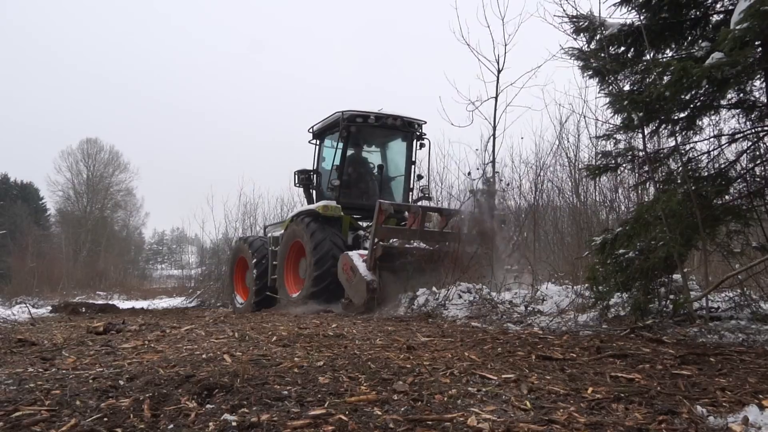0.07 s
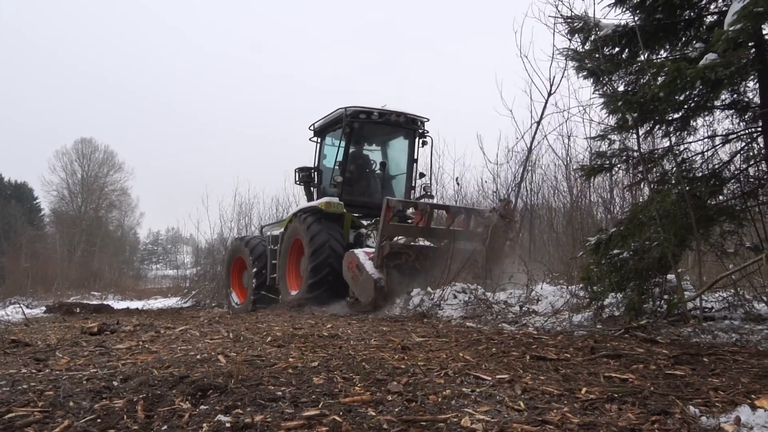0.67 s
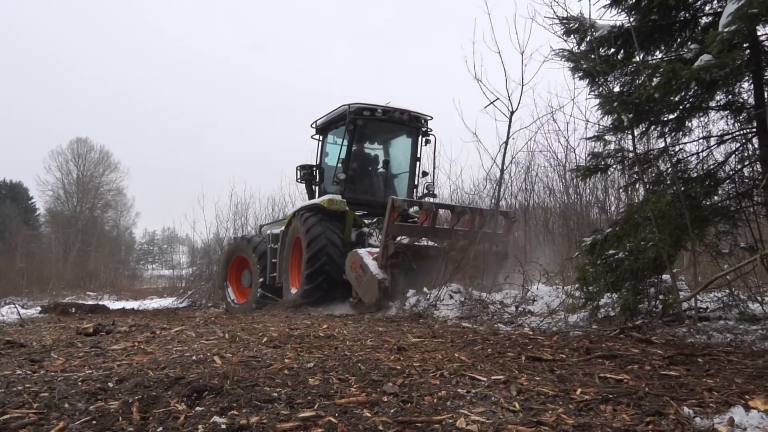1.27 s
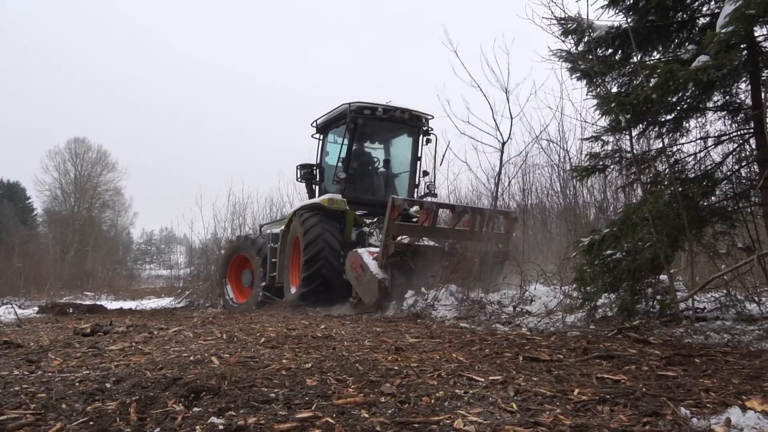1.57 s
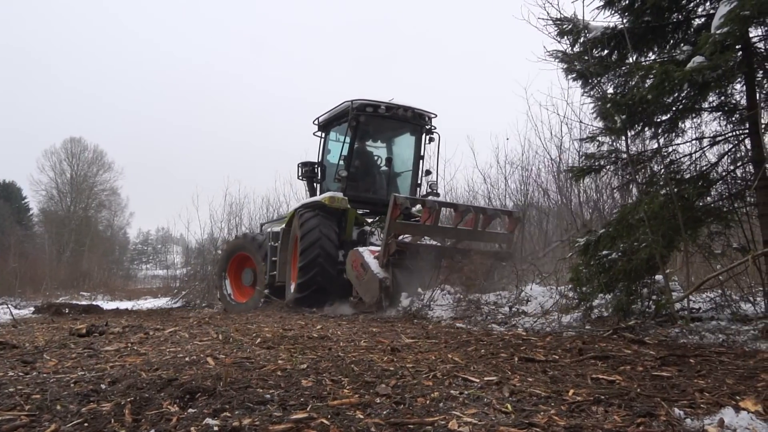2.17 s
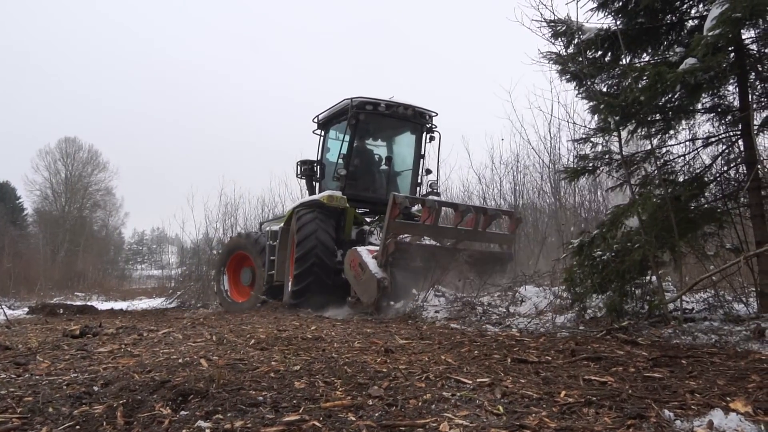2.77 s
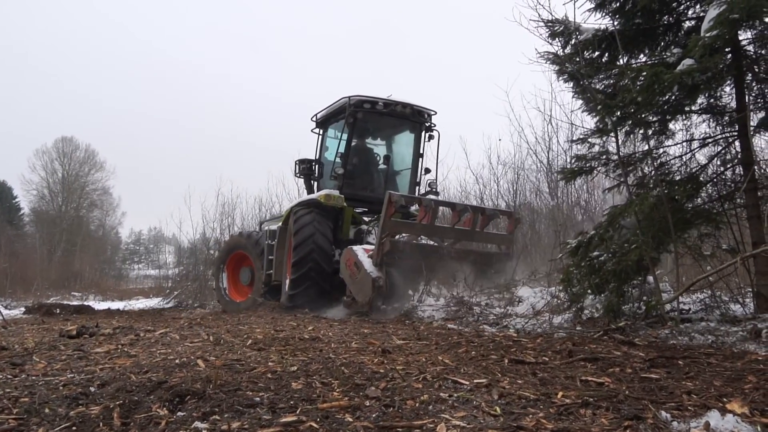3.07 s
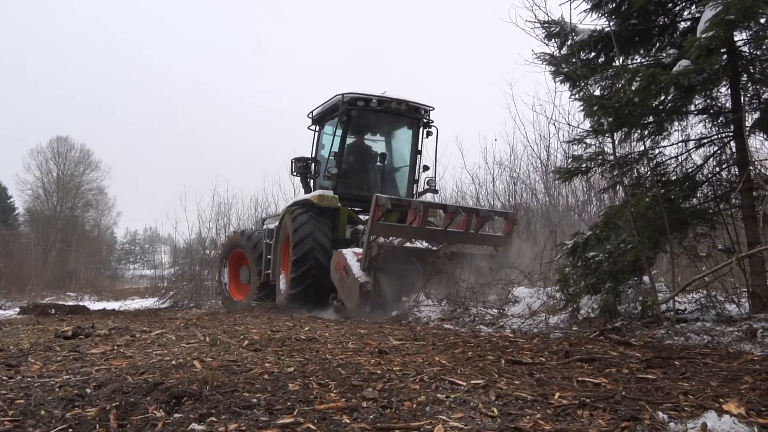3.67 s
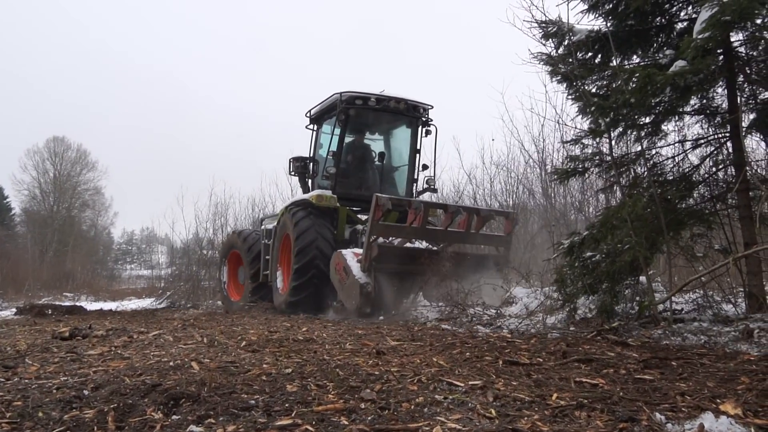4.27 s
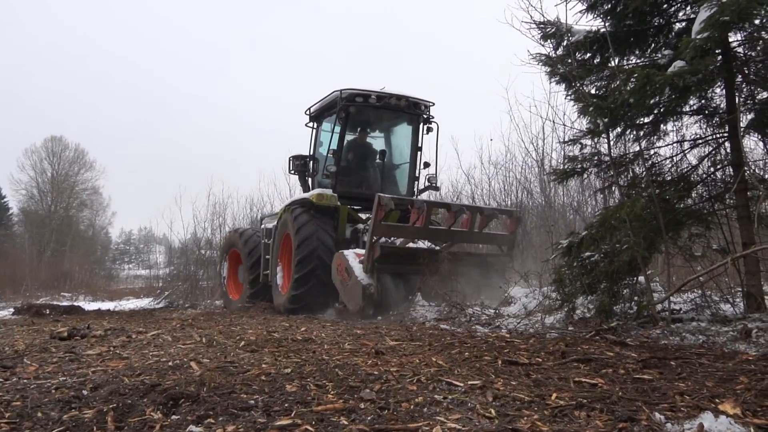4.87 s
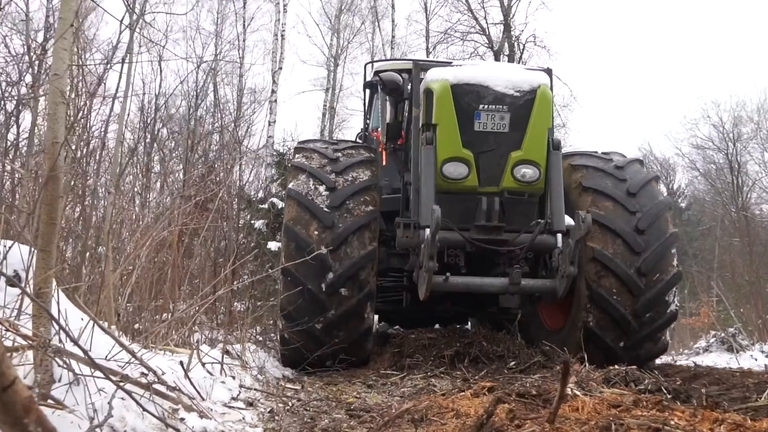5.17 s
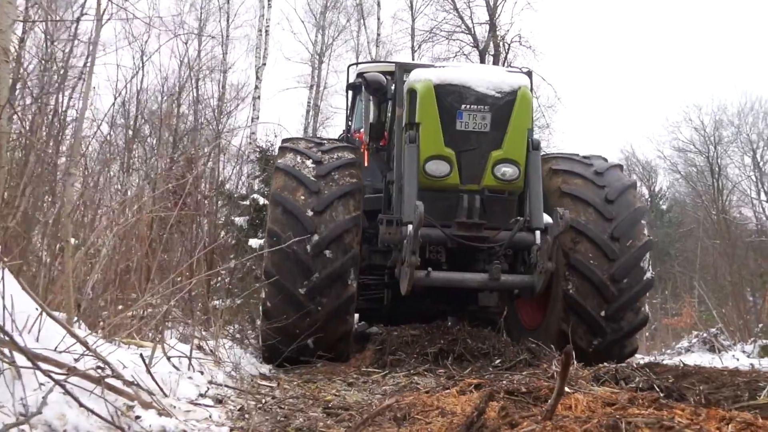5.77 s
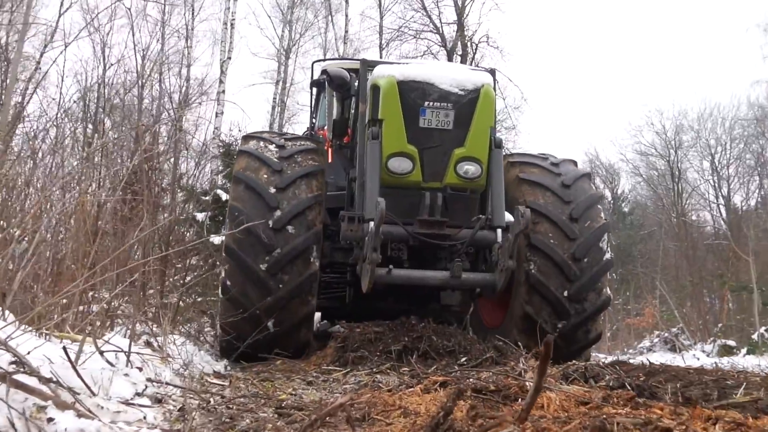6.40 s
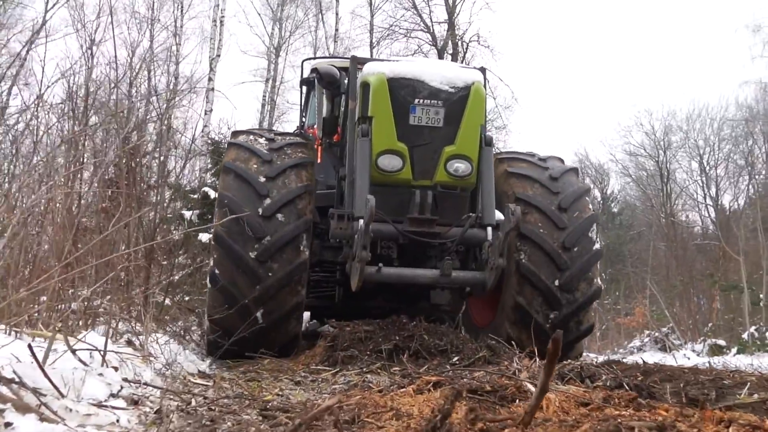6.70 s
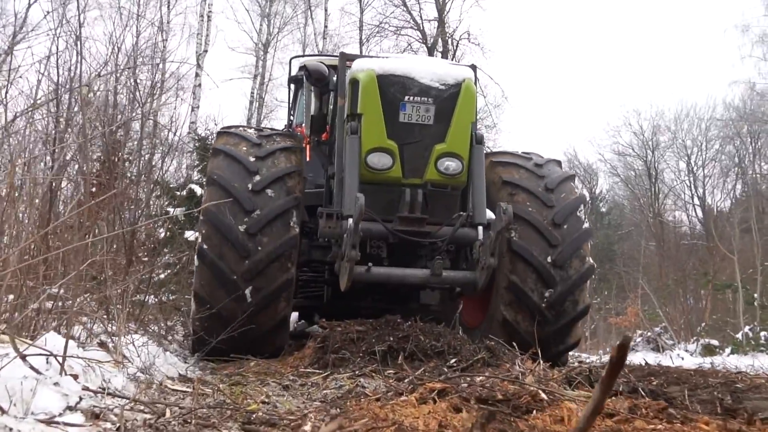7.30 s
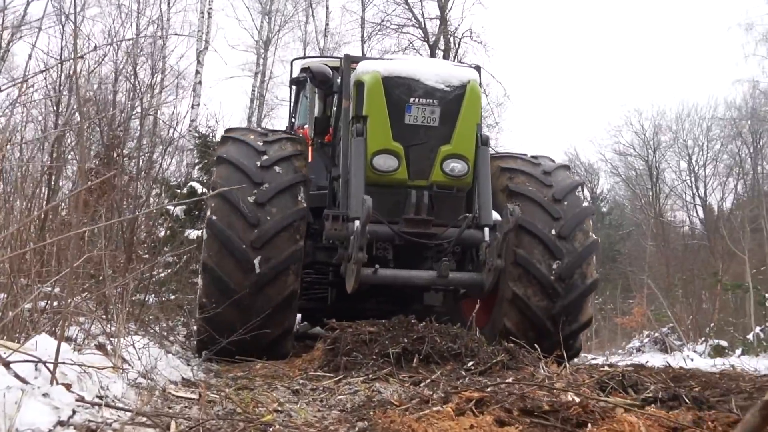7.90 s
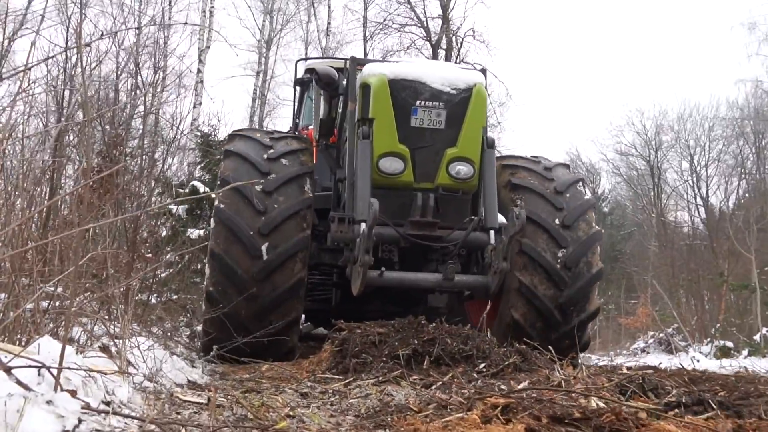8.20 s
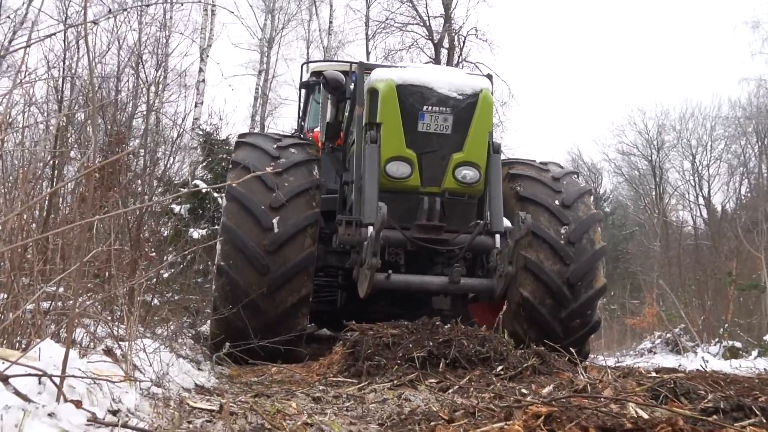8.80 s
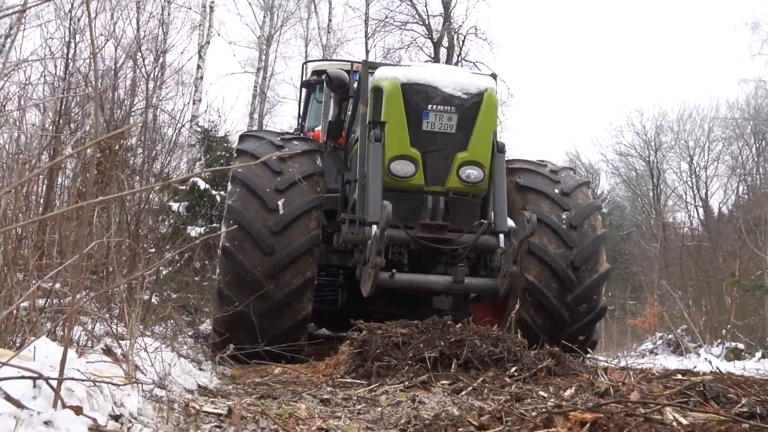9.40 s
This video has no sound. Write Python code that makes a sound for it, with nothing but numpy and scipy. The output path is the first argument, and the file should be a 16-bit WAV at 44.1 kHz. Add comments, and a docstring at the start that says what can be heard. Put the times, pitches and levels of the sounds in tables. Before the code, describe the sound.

Wood cracks and shreds in a tractor's mulcher, then the sound fades to its diesel engine clattering up close as the turbocharger winds up.

```python
"""A big tractor drives a forestry mulcher into brush: the toothed rotor splinters twigs under a steel
hood and sprays chips, over a distant exhaust drone. From about 1 s the teeth knock and chew through
a young tree, then thick stems; near 4 s something rubs and squeals. Just before 5 s the scene fades
out and back in close to the bonnet, where the six-cylinder diesel drones and clatters under load
and its turbocharger winds up to the end."""
import sys
import numpy as np
from scipy import signal
from scipy.fft import rfft, irfft
from scipy.io import wavfile
from scipy.ndimage import uniform_filter1d

SR = 44100
rng = np.random.default_rng(int(sys.argv[2]) if len(sys.argv) > 2 else 0)


def bounce(signal):
    """Save signal as a 16-bit WAV file at the path given by the first command-line argument."""
    frames = np.transpose(np.atleast_2d(signal))
    limited = np.clip(frames, -1, 1)
    pcm = np.round(limited * 32767).astype(np.int16)
    wavfile.write(sys.argv[1], SR, pcm)


N = 416744

# engine speed, sagging under load: (time [s], firing rate [Hz])
ENGINE_SPEED = [(0, 101.5), (1.1, 101.2), (1.3, 99.3), (3.4, 98), (3.9, 96.6), (5.1, 98.6), (6.4, 97.4),
                (6.95, 96), (7.7, 95.9), (8.3, 94), (8.85, 94.5), (9.44, 98.4)]
# exhaust drone from the mulcher's side: (time [s], level [dB])
FAR_DRONE = [(0, -43.5), (.8, -37), (1.15, -49), (1.7, -41.5), (2.8, -40.5), (3.5, -43.5), (4.6, -45.5)]
# engine load at the bonnet: (time [s], low roar [dB], exhaust boom at twice the firing rate [dB])
ENGINE_LOAD = [(5, -22.5, -24), (6, -21, -22), (7.2, -21.5, -20.5), (8.4, -23.5, -19.5), (9.44, -24, -19.5)]
# the other exhaust partials: (multiple of the six-firing cycle, level [dB])
EXHAUST_ORDERS = [(6, -25.5), (8, -41), (9, -38.5), (10, -42), (17, -36.5), (18, -37), (20, -33),
                  (23, -43.5), (32, -37)]
# EQ of the low roar, combustion clatter and cooling fan: (frequency [Hz], gain [dB])
ROAR_EQ = [(25, -49), (70, -12), (160, -13.5), (225, 0.5), (290, 1), (420, -1.5), (530, 3.5), (670, -5.5),
           (1100, -7.5), (3000, -31)]
CLATTER_EQ = [(400, -21), (750, -4), (1100, -1.5), (1550, 1.5), (1850, -2), (2100, -6), (3000, -7),
              (6500, -19.5)]
FAN_EQ = [(1000, 3), (3500, 9), (5800, 9.5), (6900, 3), (9500, 7.5), (12000, -1), (16000, -8)]
# turbocharger winding up: (time [s], whistle pitch [Hz])
TURBO_PITCH = [(5, 9080), (6.2, 9220), (6.6, 9290), (7, 9600), (8, 10340), (8.8, 11280), (9.44, 11630)]
# its whistle swelling and easing: (time [s], level [dB])
TURBO_LEVEL = [(5.7, -43), (6.35, -34), (6.55, -43), (7.4, -36), (8.15, -41), (8.6, -34), (9, -36)]
# air rushing through the compressor: (multiple of the whistle pitch, width [Hz], level [dB])
TURBO_RUSH = [(.74, 1503, -40), (.97, 2100, -38), (1.41, 1400, -39.5)]

# hum of the spinning rotor: (multiple of its turning rate, level [dB])
ROTOR_HUM = [(16, -53), (20, -56.5)]
# rotor churning the soil: (time [s], level [dB])
CHURN = [(0, -37.5), (.9, -34.5), (1.3, -38.5), (2.1, -36), (2.75, -31.5), (3.1, -36.5), (3.55, -31.5),
         (4.25, -34), (4.6, -39)]
# rubbing squeals: (loudest moment [s], pitch [Hz], level [dB], glide [Hz/s], fade in and out [dB/s])
SQUEALS = [(4.05, 1338, -25, 0, 43), (4.21, 1420, -33, 100, 26)]
# the loudest stems snapping on the teeth: (time [s], peak [dB], ring [Hz])
SNAPS = [(.015, -10, 3300), (.083, -6.5, 3380), (.123, -11, 2400), (.171, -11, 3600), (.192, -11, 2320),
         (.233, -8.5, 3450), (.273, -7, 3300), (.32, -7, 3320), (.373, -11, 3700), (.378, -7.5, 2470),
         (.496, -9, 3250), (.544, -11, 2900), (.991, -8, 3520), (1.48, -9, 2270), (1.721, -6, 1800),
         (1.735, -10, 2270), (2.104, -9.5, 1950), (2.466, -7, 1740), (3.432, -3.5, 3800)]
# teeth knocking into the young tree: (time [s], peak [dB])
KNOCKS = [(.961, -7), (1.009, -10), (1.049, -7.5), (1.06, -10), (1.089, -9), (1.097, -8), (1.109, -6),
          (1.114, -11), (1.129, -7), (1.138, -13), (1.148, -7), (1.163, -10), (1.178, -6), (1.189, -9),
          (1.198, -7), (1.211, -9), (1.23, -6), (1.25, -10), (1.255, -5), (1.281, -7), (1.301, -17),
          (1.355, -9.5), (1.404, -9), (1.457, -6.5), (1.502, -10), (1.522, -10), (1.578, -5), (1.628, -11),
          (1.68, -9), (1.717, -9)]
# ring of its trunk at the first knock: (frequency [Hz], relative level [dB])
TRUNK_MODES = [(1050, -9.5), (1385, 0), (1730, -3.5)]
# thick stems drawn into the teeth: (fully gripped [s], chewing time [s], level [dB])
THICK_STEMS = [(1.15, 0.32, -23.5), (1.98, 0.05, -29), (2.8, 0.12, -23.5), (3.65, 0.18, -31)]
# brush going into the rotor: (time [s], splintering [dB], spray of chips [dB])
FEED = [(0, -22, -27), (.5, -25.5, -26), (.92, -20, -28), (1.13, -26, -32), (1.5, -21, -27.5),
        (1.75, -24.5, -28.5), (2.14, -22, -29), (2.28, -20, -23), (2.62, -23.5, -26), (3.03, -18, -24),
        (3.4, -21.5, -25.5), (3.76, -17, -25.5), (4.2, -21.5, -27.5), (4.4, -26.5, -29.5),
        (4.7, -29, -34.5)]
# a branch is ripped in all at once: (time [s], lift [dB])
RIPS = [(.482, 3.5), (.822, 2), (1.637, 5), (1.673, 4.5), (1.727, 2), (1.79, 3), (1.82, 4.5), (1.877, 5),
        (3.135, 2), (3.335, 5), (3.435, 1.5)]
# the rotor runs empty for an instant between armfuls: (time [s], dip [dB])
LULLS = [(.06, 3), (.252, 4.5), (1.85, 4), (3.17, 3.5), (3.9, 6), (4.385, 6.5)]
# steel hood resonances: (frequency [Hz], width [Hz], lift [dB])
HOOD_MODES = [(860, 136, 10), (1195, 240, 10.5), (1746, 500, 9), (2337, 130, 8), (2800, 180, 4.5)]
# EQ of each material the teeth hit: (frequency [Hz], gain [dB])
SOIL_EQ = [(25, -51), (55, -13), (100, -5), (210, 2.5), (300, -4.5), (550, -2), (1000, -4.5), (4000, -64)]
CHIPS_EQ = [(150, -30), (1000, -8), (3500, 5), (6000, 5.5), (9300, 3.5), (11500, -1), (16000, -5)]
WOOD_EQ = [(250, -32), (550, -12), (750, -8), (1000, -9), (1250, -2), (1600, -6), (2200, -14), (4500, -29),
           (12000, -54)]
SPLINTERS_EQ = [(200, -34), (550, -6.5), (1000, -9.5), (1500, -2), (2200, 1), (3200, 1), (4600, -0.5),
                (7000, -9.5), (15000, -18)]

# stereo width of the first and second scene, narrow in the bass, wider and uneven in the treble:
# (frequency [Hz], side minus mid [dB])
SCENE1_WIDTH = [(700, -27), (2300, -25), (3500, -8.5), (5000, -17.5), (6300, -5), (9000, -8.5),
                (15000, -4.5)]
SCENE2_WIDTH = [(380, -19.5), (2100, -26), (3500, -8.5), (5200, -21), (6300, -8.5), (8500, -15),
                (11000, -8.5), (12200, -14)]
# mulcher and bonnet sit off to the right: (frequency [Hz], left minus right [dB])
FAR_BALANCE = [(700, -0.5), (1290, -2), (2400, -5), (4400, -2), (15000, -1.5)]
NEAR_BALANCE = [(700, -2.5), (1300, -3), (2400, -3), (5000, -0.5)]


def from_db(db):
    """Decibels to gain."""
    return 10 ** (np.asarray(db) / 20)


def unit_rms(x):
    """Scale to unit power."""
    return x / np.sqrt(np.mean(x ** 2) + 1e-20)


def automation(rows):
    """One curve over time for each value column of a table."""
    times, *columns = np.transpose(rows)
    return [np.interp(np.arange(N) / SR, times, column) for column in columns]


def bumps_db(rows, half_s):
    """A brief bell-shaped change of level at each row."""
    t = np.arange(N) / SR
    return sum(db * np.exp(-np.minimum(((t - s) / half_s) ** 2, 20)) for s, db in rows)


def drift(rate_hz):
    """Smooth random modulation of unit power."""
    knots = rng.standard_normal(int(N / SR * rate_hz) + 3)
    return unit_rms(np.interp(np.arange(N) / SR * rate_hz, np.arange(len(knots)), knots))


def eq(x, points):
    """Minimum-phase filter that follows an EQ curve."""
    size = 8192
    hz, db = np.transpose(points)
    grid = np.maximum(np.fft.rfftfreq(size, 1 / SR), 1)
    gain = from_db(np.interp(np.log(grid), np.log(hz), db))
    cepstrum = irfft(np.log(gain), size)
    cepstrum[1:size // 2] *= 2
    cepstrum[size // 2 + 1:] = 0
    response = irfft(np.exp(rfft(cepstrum)), size)[:size // 2]
    return signal.oaconvolve(x, response if x.ndim == 1 else response[None], axes=-1)[..., :N]


def stereo(pair, width=SCENE1_WIDTH):
    """Two unrelated signals become left and right, narrow in the bass and wider in the treble."""
    mid, side = pair
    return mid + eq(side, width) * np.array([[1], [-1]])


def pan_right(x, balance):
    """Lean the image to the right, most of all in the presence range; the bass stays centred."""
    points = [(200, 0), *balance]
    return np.array([eq(channel, [(hz, sign * db / 2) for hz, db in points])
                     for channel, sign in zip(x, (1, -1))])


def grains(per_s, spread_db):
    """Two trains of random clicks of uneven size."""
    clicks = np.zeros((2, N))
    born = rng.random((2, N)) < per_s / SR
    count = born.sum()
    sizes = from_db(spread_db * np.minimum(rng.exponential(1, count), 4))
    clicks[born] = sizes * np.clip(rng.standard_normal(count), -2, 2)
    return unit_rms(clicks)


def die_away(clicks, decay_s):
    """Give each click an exponential tail."""
    return signal.lfilter([1], [1, -np.exp(-1 / (decay_s * SR))], clicks + 1e-18)


def air_band(phase, width_hz):
    """Two unrelated bands of noise centred on a moving pitch."""
    pair = [drift(width_hz) * np.sin(phase) + drift(width_hz) * np.cos(phase) for _ in range(2)]
    return unit_rms(np.array(pair))


def far_engine(firings):
    """From afar the firing note and a weak octave carry."""
    db, = automation(FAR_DRONE)
    phase = 2 * np.pi * firings
    octave = from_db(-9.5) * np.sin(2 * phase + 0.84 * drift(7.5))
    return np.sqrt(2) * from_db(db) * (np.sin(phase) + octave)


def turbo():
    """The compressor whistles, with broad bands of rushing air that rise with it."""
    (hz,), (db,) = automation(TURBO_PITCH), automation(TURBO_LEVEL)
    phase = 2 * np.pi * np.cumsum(hz) / SR
    whistle = from_db(db + drift(14)) * air_band(phase, width_hz=70)
    rush = sum(from_db(band_db) * air_band(ratio * phase, width_hz)
               for ratio, width_hz, band_db in TURBO_RUSH)
    return stereo(whistle + from_db(2 * drift(45)) * rush, SCENE2_WIDTH)


def exhaust(firings, boom_db):
    """Firing harmonics crest together in a thump; unequal cylinders add wavering partials between."""
    out = 0
    for order, db in [(12, boom_db), *EXHAUST_ORDERS]:
        waver = .05 if order in (6, 12) else .3
        offset = rng.random() * (order % 6 > 0)
        phase = 2 * np.pi * (firings * order / 6 + offset)
        gain = np.sqrt(2) * from_db(db) * (1 + waver * drift(17))
        out = out + gain * np.cos(phase + waver * drift(13))
    return out


def near_engine(firings):
    """Over the exhaust, a low roar, combustion clatter and fan hiss pulse with each firing."""
    roar_db, boom_db = automation(ENGINE_LOAD)
    drone = exhaust(firings, boom_db)
    pulse = from_db(1.3 * np.cos(2 * np.pi * firings) + .7 * drift(90))
    roar = unit_rms(eq(stereo(grains(12000, spread_db=-0.5), SCENE2_WIDTH) * pulse, ROAR_EQ))
    clatter = unit_rms(eq(stereo(grains(9000, spread_db=-0.5), SCENE2_WIDTH) * pulse, CLATTER_EQ))
    fan = unit_rms(eq(stereo(grains(25000, spread_db=3.5), SCENE2_WIDTH) * pulse ** .5, FAN_EQ))
    return drone + from_db(roar_db) * roar + from_db(-20) * clatter + from_db(-29 + 1.3 * drift(40)) * fan


def rotor_hum(turns):
    """The unbalanced rotor and its rows of teeth hum faintly and unsteadily."""
    out = 0
    for multiple, db in ROTOR_HUM:
        gain = np.sqrt(2) * from_db(db + 2.5 * drift(4.95))
        out = out + gain * np.sin(2 * np.pi * multiple * turns + 0.5 * drift(9.9))
    return out


def squeals():
    """Something rubs on two rough notes; the higher takes over as the load eases, gliding up a little."""
    out = 0
    for s, hz, db, hz_per_s, db_per_s in SQUEALS:
        t = np.arange(N) / SR - s
        phase = 2 * np.pi * np.cumsum(hz + hz_per_s * t) / SR
        rough = unit_rms(1 + .55 * drift(140))
        out = out + np.sqrt(2) * from_db(db - db_per_s * np.abs(t)) * rough * np.sin(phase)
    return out


def chip_tick(at_s, gain_db):
    """A hard chip hits steel: a few milliseconds of very bright noise."""
    blow = np.zeros(N)
    blow[round(at_s * SR)] = from_db(gain_db)
    bright = signal.lfilter(*signal.butter(2, 9000, "high", fs=SR), rng.standard_normal((2, N)))
    return stereo(bright) * die_away(blow, decay_s=.006)


def chip_spray(teeth):
    """Chips leave in gusts, with scattered large ones ticking against steel."""
    fine = grains(16000, spread_db=0.5) * teeth ** 0.29
    large = 0.41 * grains(170, spread_db=3)
    gusts = from_db(2 * drift(70))
    return unit_rms(eq(stereo(fine + large) * gusts, CHIPS_EQ))


def stem_snaps(decay_s, ring_db):
    """A stem bursts in tearing fibres around its own brief ring: thin ones crack high, thick ones lower."""
    out = np.zeros(N + SR)
    t = np.arange(SR // 20) / SR
    for s, db, hz in SNAPS:
        band = signal.butter(2, [0.65 * hz, 1.28 * hz], "band", fs=SR, output="sos")
        fibres = unit_rms(signal.sosfilt(band, rng.standard_normal(len(t))))
        ring = from_db(ring_db) * np.sin(2 * np.pi * hz * t)
        crack = (fibres + ring) * (1 - np.exp(-hz * t)) * np.exp(-t / decay_s)
        start = round(s * SR)
        out[start:start + len(t)] += from_db(db) * crack / np.abs(crack).max()
    return out[:N]


def trunk_knocks(decay_s, tearing_db, sag_octaves_per_s):
    """Each tooth sets the trunk ringing briefly; the pitch sinks as the tree is pulled in."""
    out = np.zeros(N + SR)
    t = np.arange(SR // 20) / SR
    body = signal.butter(2, [750, 2300], "band", fs=SR, output="sos")
    for s, db in KNOCKS:
        sag = 2 ** (-sag_octaves_per_s * (s - KNOCKS[0][0]))
        ring = 0
        for hz, mode_db in TRUNK_MODES:
            gain = from_db(mode_db + 2 * rng.standard_normal())
            ring = ring + gain * np.sin(2 * np.pi * (hz * sag * t + rng.random()))
        fibres = unit_rms(eq(rng.standard_normal(len(t)), WOOD_EQ)[:len(t)])
        knock = signal.sosfilt(body, (ring + from_db(tearing_db) * fibres) * np.exp(-t / decay_s))
        start = round(s * SR)
        out[start:start + len(t)] += from_db(db) * knock / np.abs(knock).max()
    return out[:N]


def chewing_gain(branches_db, grip_db_per_s, release_db_per_s):
    """Over a bed of small branches, each stem swells as it is gripped, holds while chewed and fades."""
    t = np.arange(N) / SR
    power = from_db(branches_db) ** 2
    for s, chew_s, db in THICK_STEMS:
        attack_db = grip_db_per_s * np.maximum(s - t, 0)
        release_db = release_db_per_s * np.maximum(t - s - chew_s, 0)
        power = power + from_db(db - attack_db - release_db) ** 2
    return np.sqrt(power)


def steel_hood(x):
    """The hood rings briefly at a few pitches."""
    out = x
    for hz, width_hz, lift_db in HOOD_MODES:
        ring = signal.lfilter(*signal.iirpeak(hz, hz / width_hz, fs=SR), x)
        out = out + (from_db(lift_db) - 1) * ring
    return out


def tooth_bites(turns, rows, uneven_db, throb_db, decay_s, steady):
    """Rows of teeth strike in turn, hardest on one side of the rotor; each bite crumbles away."""
    hits = np.flatnonzero(np.diff(np.floor(turns * rows + .2 * drift(70))) > 0)
    lopsided = np.cos(2 * np.pi * turns[hits]) + .5 * np.cos(np.pi * rows * turns[hits])
    blows = np.zeros(N)
    blows[hits] = from_db(throb_db * lopsided + uneven_db * rng.uniform(-1, 1, len(hits)))
    force = unit_rms(die_away(blows, decay_s)) + steady
    # levelled over 0.1 s, so that the feed sets the loudness
    return force / np.sqrt(uniform_filter1d(force ** 2, SR // 10))


def mulcher(firings):
    """The rotor, geared to the engine, splinters brush, chews wood, throws chips and churns soil."""
    turns = firings / 5
    (feed_db, spray_db), (churn_db,) = automation(FEED), automation(CHURN)
    teeth = tooth_bites(turns, rows=6, uneven_db=7, throb_db=5, decay_s=0.0073, steady=0.99)
    chops = tooth_bites(turns, rows=3, uneven_db=3, throb_db=-0.5, decay_s=0.0089, steady=0.08)
    splinters = unit_rms(steel_hood(eq(stereo(grains(14000, spread_db=0.9)) * teeth, SPLINTERS_EQ)))
    wood = unit_rms(steel_hood(eq(stereo(grains(9000, spread_db=0)) * chops, WOOD_EQ)))
    chips = chip_spray(teeth)
    soil = unit_rms(eq(grains(3000, spread_db=0.5)[0] * teeth ** 0.29, SOIL_EQ))
    chewing = chewing_gain(branches_db=-38, grip_db_per_s=20, release_db_per_s=54)
    cutting = from_db(feed_db) * splinters + chewing * wood + from_db(spray_db) * chips
    snaps = stem_snaps(decay_s=0.0033, ring_db=-5)
    knocks = trunk_knocks(decay_s=0.0037, tearing_db=-6, sag_octaves_per_s=0.4)
    intake = from_db(bumps_db(RIPS, half_s=0.013) - bumps_db(LULLS, half_s=0.02))
    return intake * cutting + snaps + knocks + from_db(churn_db) * soil + rotor_hum(turns)


def scene():
    """The mulcher fades to silence; the bonnet fades in on the right and eases towards the middle."""
    change_s, fade_out_s, fade_in_s, centring_s = 4.948, 0.26, 0.57, 7.9
    t = np.arange(N) / SR
    firings = np.cumsum(automation(ENGINE_SPEED)[0]) / SR
    mulching = mulcher(firings) + chip_tick(at_s=3.371, gain_db=-16) + squeals() + far_engine(firings)
    engine = near_engine(firings)
    aside = np.exp(-np.maximum(t - change_s, 0) / centring_s)
    bonnet = aside * pan_right(engine, NEAR_BALANCE) + (1 - aside) * engine + turbo()
    fade_out = np.clip((change_s - t) / fade_out_s, 0, 1)
    fade_in = np.clip((t - change_s) / fade_in_s, 0, 1)
    return fade_out * pan_right(mulching, FAR_BALANCE) + fade_in * bonnet


def record(dry):
    """A soft clip rounds the highest peaks and a steep low-pass cuts the top."""
    rounded = dry / (1 + (dry / .8) ** 4) ** .25
    return signal.sosfilt(signal.ellip(12, .1, 80, 15800, fs=SR, output="sos"), rounded)


dry = scene()
out = record(dry)
bounce(out)
```